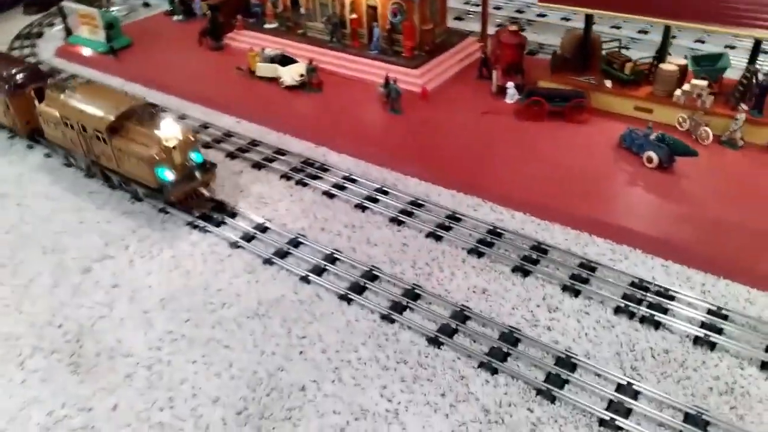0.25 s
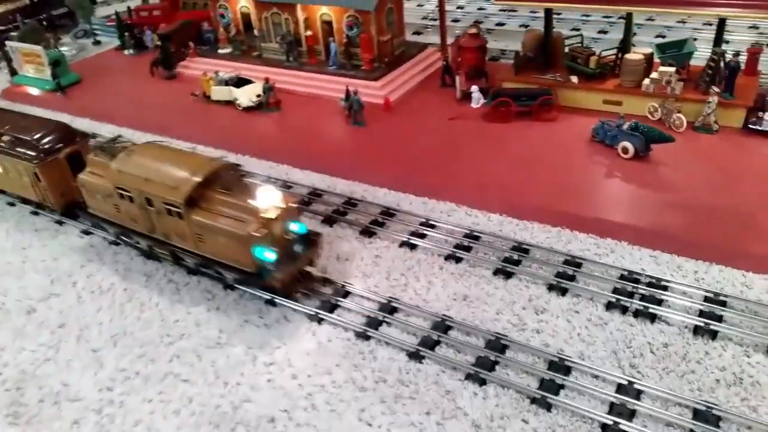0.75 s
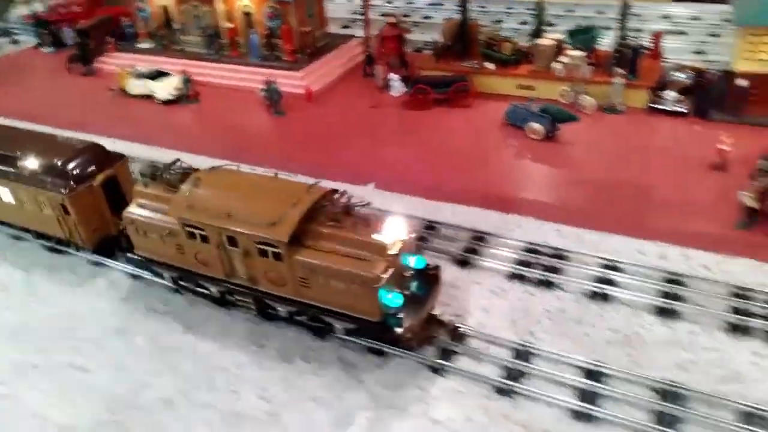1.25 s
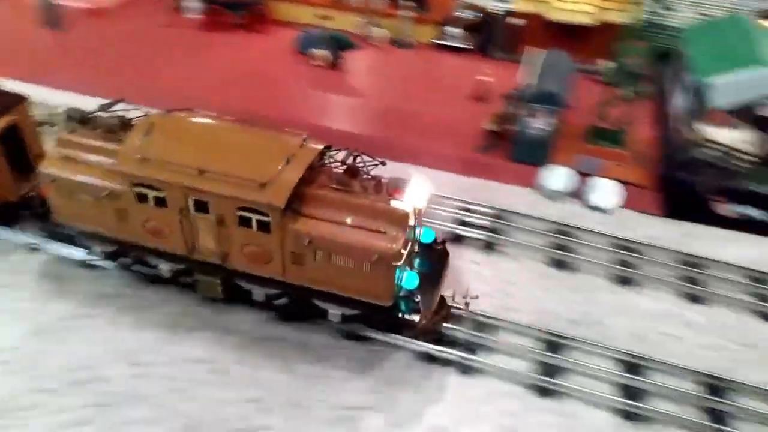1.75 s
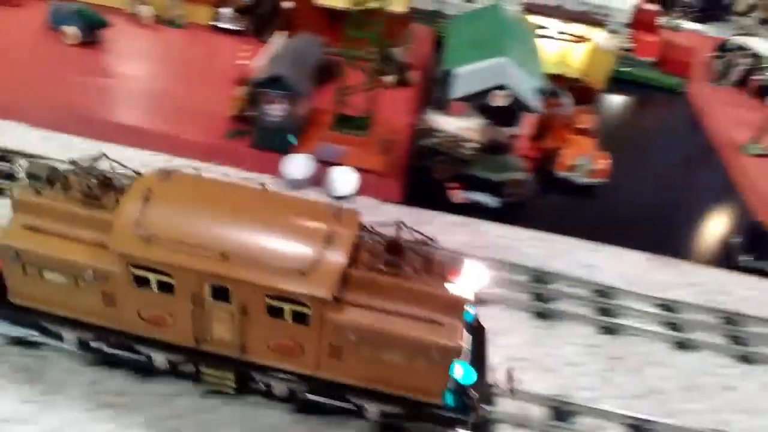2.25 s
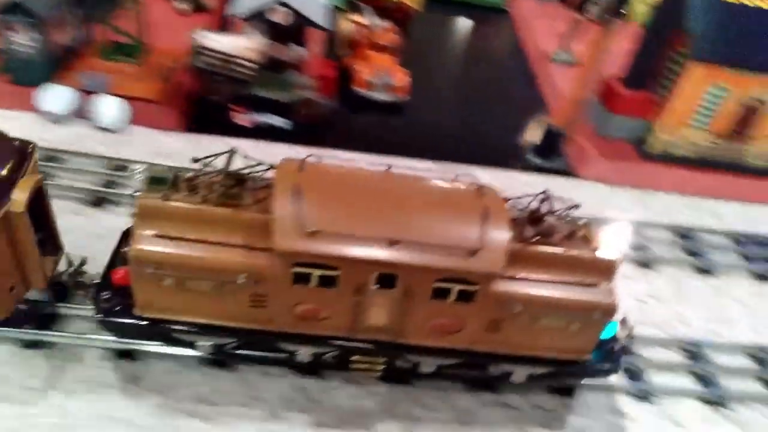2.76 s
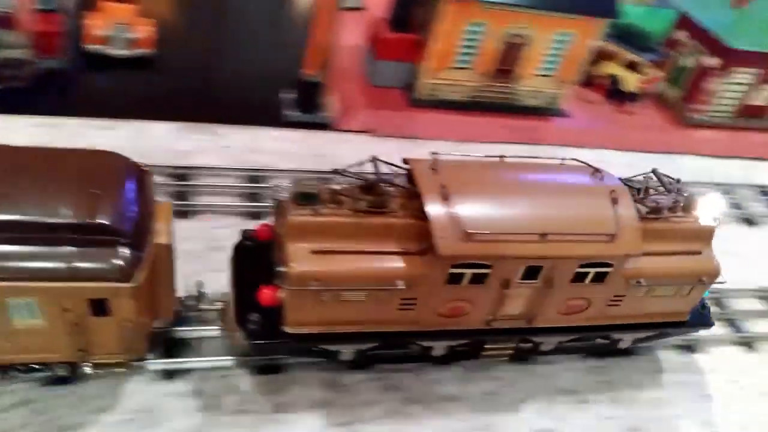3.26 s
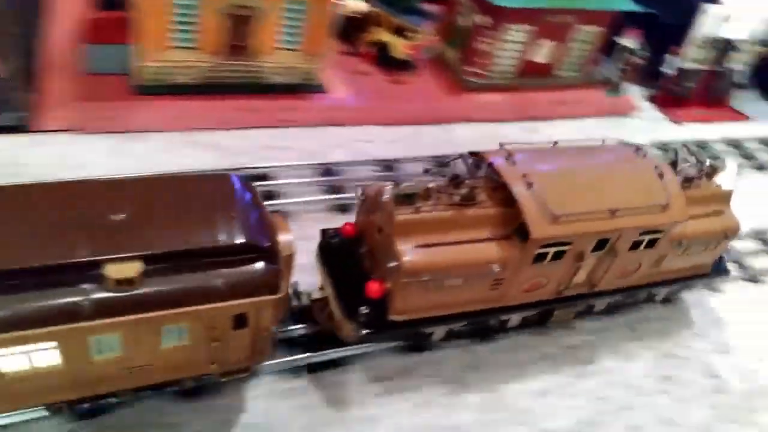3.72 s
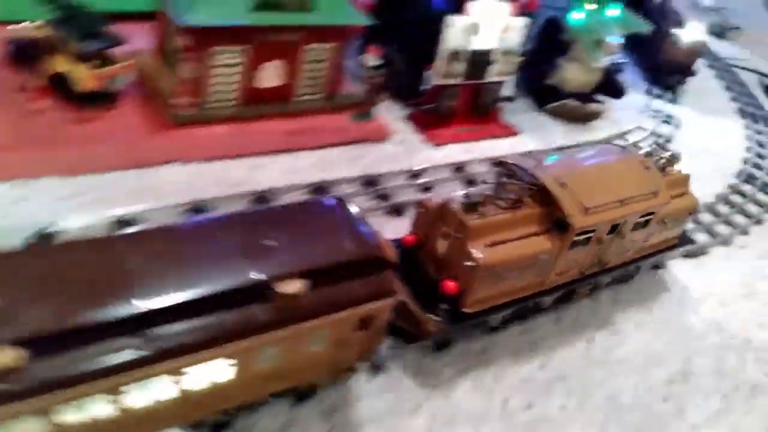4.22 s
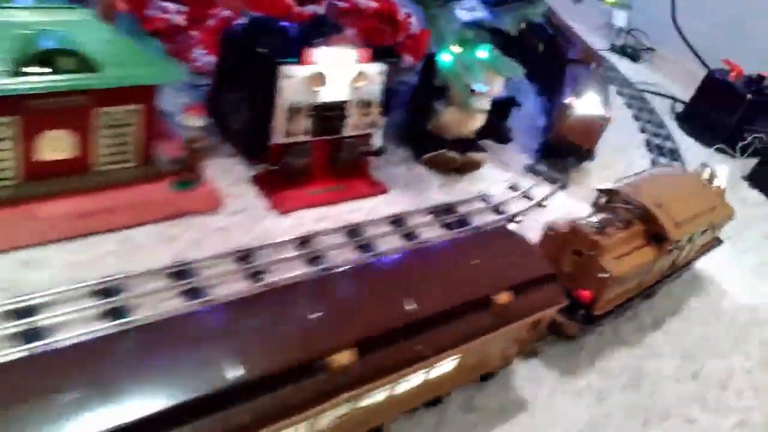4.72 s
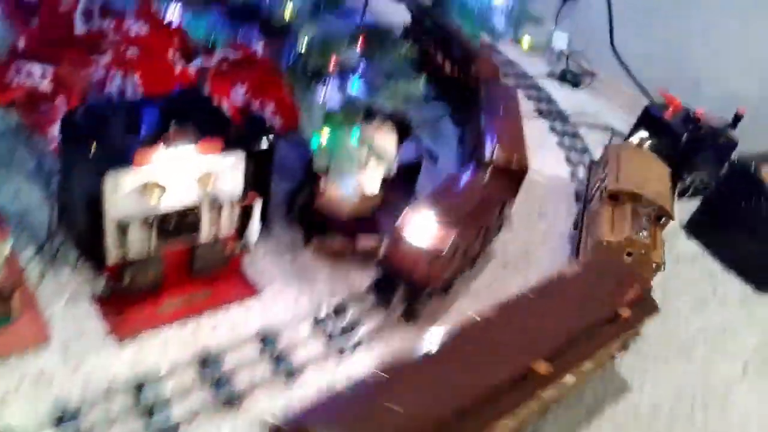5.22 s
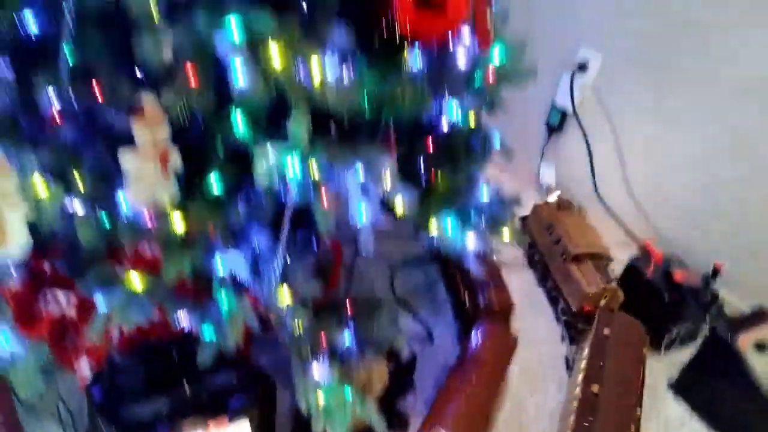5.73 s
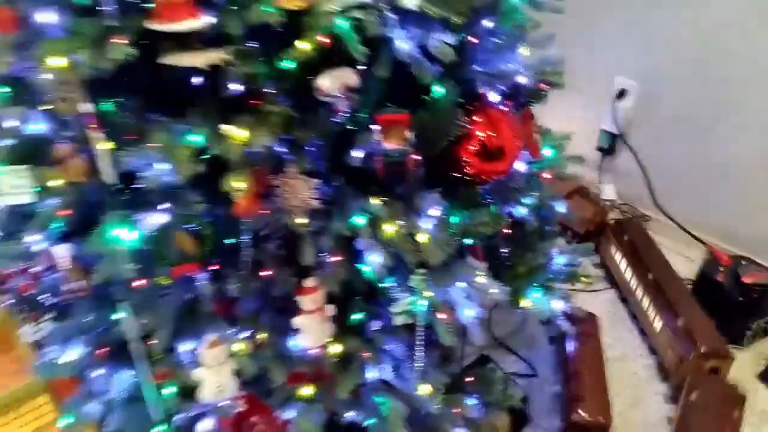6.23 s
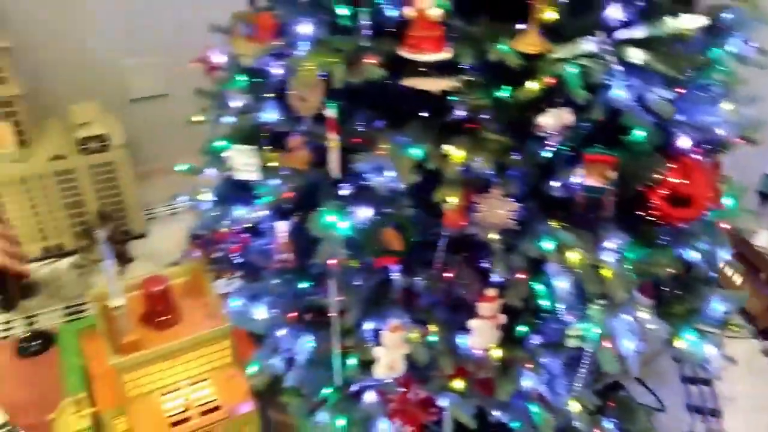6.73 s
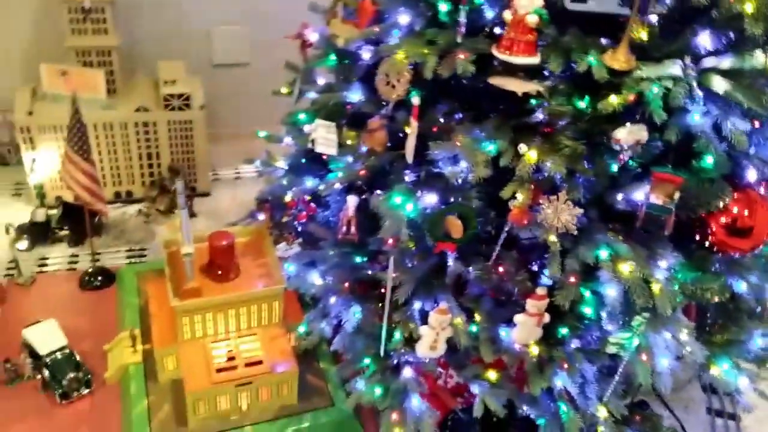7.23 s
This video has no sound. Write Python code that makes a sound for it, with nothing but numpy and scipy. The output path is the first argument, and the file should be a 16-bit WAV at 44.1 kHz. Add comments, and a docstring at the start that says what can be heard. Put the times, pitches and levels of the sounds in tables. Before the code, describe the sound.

Indoors, over a faint low room hum, a heavy tin toy train approaches on metal rails. A soft rumble and airy hiss grow into a fuller rattling roll with gear grind and crackle, strongest around one and a half to three and a half seconds. Very high scraping chirps and tiny pings recur, then settle to an even pulse as it recedes. Close stereo handheld microphone, the train crossing right to left.

```python
"""A heavy tinplate toy train rolls past on tubular steel track on carpet, over a low room hum.
From the start shaped noise gives the rumble of its bodies and the grind, whirr and hiss of rolling,
with short swells of narrow noise. Flange rubs soon drive the wheels by stick and slip; hard slips ping.
Delay and level between two microphones carry the train from right to left; after six seconds
narrow noise slides up in a hollow tone while the rolling goes on to the end."""
import sys
import numpy as np
from scipy import signal
from scipy.io import wavfile
from scipy.ndimage import uniform_filter1d

SR = 44100
rng = np.random.default_rng(int(sys.argv[2]) if len(sys.argv) > 2 else 0)


def waveform_to_disk(signal):
    """Save audio, clipped to [-1, 1], as 16-bit WAV at the path in sys.argv[1]."""
    frames = np.transpose(np.atleast_2d(signal))
    scaled = np.clip(frames, -1, 1) * 32767
    samples = np.round(scaled).astype(np.int16)
    wavfile.write(sys.argv[1], SR, samples)


N = 329691
HOP = 128  # samples between steps of the slow controls

# reference levels of the passing train, offset or scaled for each sound; positive lean is to the left:
# time_s, rumble_db, gears_db, whirr_db, hiss_db, lean_db
TRAIN_PATH = [(0.0, -61.5, -69, -65.5, -49, -1), (0.4, -59.5, -69, -64, -47, -3),
              (0.66, -61.5, -67.5, -68, -45.5, -3.5), (0.8, -60.5, -58.5, -65, -45, -4.5),
              (0.95, -55.5, -57, -58.5, -44.5, -2), (1.45, -49.5, -56.5, -56, -44.5, -5),
              (1.8, -56, -63, -57, -44, -4), (2.12, -53, -56, -51.5, -39.5, -2.5),
              (2.3, -53, -61.5, -55.5, -41.5, 0), (2.62, -56, -54, -49.5, -40.5, -1),
              (2.8, -56.5, -65, -57, -40.5, -5), (3.05, -54.5, -55, -56.5, -39, -1.5),
              (3.4, -54, -66, -53, -39.5, -1), (3.7, -56.5, -63.5, -61, -41.5, -2.5),
              (4.05, -57.5, -63, -56, -40, 0), (4.35, -56.5, -60, -57.5, -41.5, -1),
              (4.55, -57.5, -63, -60.5, -41, -0.5), (4.9, -58, -63.5, -62, -40.5, -0.5),
              (5.3, -59.5, -60.5, -63.5, -41.5, -1.5), (5.85, -59.5, -63, -63.5, -40.5, -2),
              (6.3, -61, -63.5, -64.5, -44.5, 0), (6.93, -60.5, -65, -66, -44, 0),
              (7.0, -58, -59, -79, -47.5, 4), (7.18, -62.5, -61, -72, -45.5, 4.5),
              (7.38, -55.5, -59, -67, -45.5, 2.5), (7.476, -58, -62, -63, -46, 0)]
# delay of the passing train at the left microphone: time_s, left_delay_samples
LEFT_DELAY = [(0, 7), (2.8, 6), (3.7, -1), (4.7, -6), (6.3, -7), (7.476, -4)]
# flange rubs; a rub spans its half length on either side of the centre:
# centre_s, half_length_s, ring_db, lower_over_upper_db, high_over_ring_db, scrape_over_ring_db, lean_db
FLANGE_RUBS = [(0.233, 0.14, -45, -17, -4, -14.5, -4), (0.452, 0.019, -44, -1.0, -20.0, -22, -11),
               (0.54, 0.15, -43, -9, -1, -11, -9), (0.604, 0.044, -44.5, 3, -12, -24, 0),
               (0.773, 0.032, -42, -5, -19.0, -25, -16), (0.875, 0.032, -27, -30, -20, -40, -31.0),
               (0.903, 0.061, -36, -19, -3, -16, -10), (1.219, 0.096, -37.5, -6, -8, -9.5, -3),
               (1.316, 0.067, -44, -2, -4, -5, -7), (1.52, 0.053, -28.5, -18, -7, -15.5, 2),
               (1.578, 0.084, -34.5, 4, 0, -8, -7), (1.823, 0.071, -40, -12, -1.5, -5, -22),
               (1.885, 0.079, -31, 8, -15, -5.5, 2), (2.01, 0.044, -43.5, 12.0, -17, 1.5, 0),
               (2.091, 0.12, -44, 0, 5.5, -2, -17), (2.145, 0.064, -38.5, -7, -4, 3, -6),
               (2.277, 0.051, -51.5, 0.0, -4, 8.5, -7), (2.442, 0.25, -44, -17, -2, -1.5, -22),
               (2.65, 0.065, -49, 6.0, 4, 10.5, -3), (2.716, 0.05, -38.5, -3, -8, -8, -1),
               (2.998, 0.035, -44, 1, -1, -15, -1), (3.057, 0.12, -46.5, -7, -4, -1.5, 4),
               (3.253, 0.057, -37.5, -12, -5, -10, 0), (3.304, 0.077, -35.5, 20, -13, -7.5, 18),
               (3.453, 0.067, -42.5, 1, -5, -4, 2), (3.529, 0.063, -26.5, -12, -11, -15, -9),
               (3.587, 0.1, -46.5, 6.0, -1, 3.5, 24), (3.797, 0.096, -35.5, -5, -9, -6.5, 4),
               (3.86, 0.068, -43.5, -1, -12, -1.5, 4), (3.906, 0.022, -46, 13.0, -18.0, -20, 0),
               (4.054, 0.093, -36.5, 2, -7, -9, 1), (4.28, 0.1, -38, 3, -4, -8.5, 4),
               (4.506, 0.068, -38, 0.0, -2, -9.5, 4), (4.738, 0.078, -35, -2, -7, -16, 0),
               (4.97, 0.092, -40, -2, -7, -12.5, 1), (5.199, 0.13, -39, 3, -9, -14.5, 4),
               (5.4, 0.084, -37, 5, -15, -17, 1), (5.41, 0.05, -43, 0, 7, -11, -8),
               (5.635, 0.075, -35.5, -3, -14, -15, 0), (5.865, 0.18, -40.5, 1, -11, -9.5, 0),
               (6.094, 0.065, -40, -4, -8, -14, 1), (6.33, 0.06, -38, -2, -13, -20, -1),
               (6.572, 0.14, -44.5, -3, -11, -16, 0), (6.853, 0.09, -37.5, 4, -13, -15.5, -4),
               (7.075, 0.11, -39.5, -2, -9, -12, -1.5), (7.337, 0.12, -44.5, -7, -8, -12.5, -4)]
# likeness of the noise at the two microphones: frequency_hz, likeness (0 to 1)
LIKENESS = [(30, 0.15), (130, 0.84), (300, 0.8), (640, 0.46), (1400, 0.27), (3000, 0.037), (9000, 0.062)]
# sheet-metal panels and rails that ring with the rolling: frequency_hz, level_over_rumble_db
PANEL_MODES = [(344, -18.5), (527, -15.5), (770, -25), (1100, -26), (1296, -17.5), (2080, -18.5),
               (2530, -17.5), (3356, -22), (5249, -18), (6216, -17)]


def gain_of(db):
    """Level definition: decibels to an amplitude factor."""
    return 10 ** (np.asarray(db) / 20)


def evened(x):
    """Normalisation by mean power: scaled to an rms of 1."""
    return x / np.sqrt(np.mean(x ** 2) + 1e-20)


def read(points, hz):
    """Spectral interpolation on a log-frequency axis."""
    f, value = np.transpose(points)
    return np.interp(np.log(hz + 1), np.log(f + 1), value)


def control(table, column, t):
    """Linear interpolation of one table column at the times t."""
    rows = np.asarray(table)
    return np.interp(t, rows[:, 0], rows[:, column])


def side_gains(level_db, lean_db):
    """Level stereophony: the lean is the left-right difference, shared equally."""
    return gain_of(level_db + np.array([lean_db / 2, -lean_db / 2]))


def partly_alike(same, shared, own):
    """Partial coherence: a mixture of shared and independent noise at constant power."""
    return same * shared + np.sqrt(1 - same ** 2) * own


def resonate(x, hz, width):
    """Heterodyne resonator: shifts the curve hz down to zero, smooths twice, and shifts back."""
    turn = np.exp(2j * np.pi * np.cumsum(hz * np.ones(x.shape[-1])) / SR)
    r = np.exp(-np.pi * width / SR)
    once = signal.lfilter([1 - r], [1, -r], x / turn)
    twice = signal.lfilter([1 - r], [1, -r], once)
    return 2 * (turn * twice).real


def rolling_noise(spectrum, level_db, lean_db, size, patchy_db, flicker_db):
    """Short-time synthesis of random spectra, with patches, flicker and a delay between microphones."""
    hop = size // 4
    frames, hz = N // hop + 5, np.fft.rfftfreq(size, 1 / SR)[:, None]
    a, b, c, d, left_patch, right_patch = rng.standard_normal((frames, len(hz), 6)).T
    # patches of 300 Hz by 50 ms, at least two cells each way
    wide, long = max(round(300 * size / SR), 2), max(round(.05 * SR / hop), 2)
    patches = []
    for p in (left_patch, left_patch + right_patch):
        patches.append(evened(uniform_filter1d(uniform_filter1d(p, wide, 0), long, 1)))
    flicker = evened(uniform_filter1d(rng.standard_normal(frames), 3))
    same, right = np.clip(read(LIKENESS, hz), 0, 1), a + 1j * b
    delay = control(LEFT_DELAY, 1, np.arange(frames) * hop / SR)
    late = np.exp(-2j * np.pi * hz * delay / SR)
    z = np.array([partly_alike(same, late * right, c + 1j * d), right])
    z *= gain_of(read(spectrum, hz) + patchy_db * np.array(patches) + flicker_db * flicker)
    noise = signal.istft(z, nperseg=size, noverlap=size - hop)[1][:, :N]
    return side_gains(level_db, lean_db) * evened(noise)


def room_hum():
    """Stationary low-frequency noise: the steady hum indoors."""
    # spectrum shape: frequency_hz, density_db_per_hz
    room_spectrum = [(15, -52), (25, -47), (102, -0.5), (145, -9.5), (220, -2), (290, -30), (480, -120)]
    return rolling_noise(room_spectrum, -75.5, np.zeros(N), size=4096, patchy_db=6.5, flicker_db=-0.5)


def body_rumble(rumble_db, lean_db):
    """Broadband panel radiation: rolling noise of the bodies, its bass weighted over time."""
    # spectrum shape: frequency_hz, density_db_per_hz
    rumble_spectrum = [(40, -60), (100, -42), (170, -17.5), (217, -6.5), (324, -0.5), (391, -2.5),
                       (432, 0.5), (522, -2.5), (653, -1), (809, -4.5), (943, -3.5), (1270, -2.5),
                       (1450, -9.5), (1880, -10), (3190, -120)]
    # gain of the bass band: time_s, gain_db
    bass_gain = [(0, -1.5), (0.7, -0.5), (1.5, -4.5), (1.85, 1.5), (2.3, -2), (2.65, 1.5), (3.2, 0),
                 (3.8, 0), (4.3, 0.5), (4.8, 2.5), (5.8, -1), (6.7, -1.5), (7.476, -7)]
    rumble = rolling_noise(rumble_spectrum, rumble_db, 0.26 * lean_db, size=1024, patchy_db=4.0, flicker_db=1.0)
    band = signal.butter(2, [196, 660], "bandpass", fs=SR, output="sos")  # Hz
    bass = signal.sosfiltfilt(band, rumble)
    return rumble + (gain_of(control(bass_gain, 1, np.arange(N) / SR)) - 1) * bass


def gear_grind(gears_db, lean_db):
    """Random excitation of the gears: mid-frequency shaped noise."""
    # spectrum shape: frequency_hz, density_db_per_hz
    grind_spectrum = [(820, -61), (1400, -12.5), (1890, -10.5), (2080, -7.5), (2560, -10), (2850, -12.5),
                      (3640, -36), (6160, -120)]
    return rolling_noise(grind_spectrum, gears_db, 1.3 * lean_db, size=1024, patchy_db=2.0, flicker_db=2.0)


def rail_whirr(whirr_db, lean_db):
    """Rolling excitation of the rails: shaped noise a few kilohertz high."""
    # spectrum shape: frequency_hz, density_db_per_hz
    whirr_spectrum = [(1590, -36), (2700, -7), (3030, -7), (3440, -3), (4820, -6), (5500, -10), (7150, -37),
                      (12100, -120)]
    return rolling_noise(whirr_spectrum, whirr_db + 0.5, 2.04 * lean_db, size=512, patchy_db=3.5, flicker_db=0.85)


def sliding_hiss(hiss_db, lean_db):
    """Sliding friction at the contacts: high-frequency shaped noise."""
    # spectrum shape: frequency_hz, density_db_per_hz
    hiss_spectrum = [(2650, -26.5), (4500, -17), (5900, -22.5), (7180, -8), (8640, -0.5), (9450, -4),
                     (9920, -6), (10700, -3.5), (12200, -8.5), (14000, -18), (15200, -21), (16000, -22)]
    return rolling_noise(hiss_spectrum, hiss_db - 5.0, 0.3 * lean_db, size=256, patchy_db=4.5, flicker_db=1.1)


def crackle(level_db, lean_db):
    """Impulse response to grit under the wheels: sparse uneven grains ring briefly in the rails."""
    # rail resonances; the width is that of each of two smoothings: frequency_hz, width_hz, over_whirr_db
    rail_modes = [(1240, 620, -16.5), (2500, 860, -9), (3310, 1080, -7), (6060, 1300, -6)]
    grains_per_s, spread_db = 700, 6.5
    chance, size = rng.random((2, 2, N))
    sign = np.sign(np.roll(size, 1) - .5)
    grains = (chance < grains_per_s / SR) * gain_of(-spread_db * np.log(size + 0.0093)) * sign
    rings = sum(gain_of(db) * evened(resonate(grains, hz, width)) for hz, width, db in rail_modes)
    return side_gains(level_db, lean_db) * rings


def flutter():
    """Amplitude modulation by wheel chatter: one quick, uneven wobble of level."""
    depth_db, smooth_s = 1.08, 0.028
    wobble = uniform_filter1d(rng.standard_normal(N), round(smooth_s * SR))
    wobble = uniform_filter1d(wobble, round(smooth_s * SR / 2))
    return evened(gain_of(depth_db * evened(wobble)))


def drone(rumble_db, lean_db):
    """Forced modal vibration: rolling keeps every panel humming, each waxing and waning on its own."""
    width_hz, damping, waver_depth_db = 23, 0.0056, 3.5  # width grows by the damping share of the pitch
    out, steps = np.zeros((2, N)), np.arange(N // HOP + 2)
    for hz, db in PANEL_MODES:
        shake, same = rng.standard_normal((2, N)), np.clip(read(LIKENESS, hz), 0, 1)
        shake[0] = partly_alike(same, shake[1], shake[0])
        waver = evened(uniform_filter1d(rng.standard_normal(len(steps)), 40))
        waver_db = waver_depth_db * np.interp(np.arange(N) / HOP, steps, waver)
        out += gain_of(db + waver_db) * evened(resonate(shake, hz, width_hz + damping * hz))
    return side_gains(rumble_db, lean_db) * out


def noise_swells(rows):
    """Windowed narrow-band noise: each row is a short swell of filtered noise at one pitch."""
    lean_spread_db = 3.5
    out, t = np.zeros((2, N + 12000)), np.arange(-6000, 6000) / SR  # longer swells are cut to this span
    for (s, half_length, hz, db), noise in zip(rows, rng.standard_normal((len(rows), 2, len(t)))):
        same, late = np.clip(read(LIKENESS, hz) + 0.05, 0, 1), round(control(LEFT_DELAY, 1, s))
        pan_db = control(TRAIN_PATH, 5, s) + lean_spread_db * noise[0, 0]
        left = partly_alike(same, np.roll(noise[1], late), noise[0])
        swell = resonate(np.array([left, noise[1]]), hz, 42 + 0.076 * hz)
        swell *= np.cos(np.pi / 2 * np.clip(t / half_length, -1, 1)) ** 2
        swell *= np.sqrt(half_length * SR) / np.linalg.norm(swell, axis=1, keepdims=True)
        at = round(s * SR)
        out[:, at:at + len(t)] += side_gains(db, pan_db)[:, None] * swell
    return out[:, 6000:N + 6000]


def rattles(count):
    """Random modal excitation: small swells at chance moments, each at one panel pitch."""
    half_length_s, over_rumble_db, spread_db = 0.041, 5.5, 0.5
    when, which, size = rng.random((count, 3)).T
    s, chosen = when * N / SR, (which * len(PANEL_MODES)).astype(int)
    hz, db = np.asarray(PANEL_MODES)[chosen].T
    db = db + control(TRAIN_PATH, 1, s) + over_rumble_db - spread_db * np.log(size + 0.019)
    return noise_swells([(a, half_length_s, f, level) for a, f, level in zip(s, hz, db)])


def rolling_swells():
    """Narrow-band fluctuation of the rolling sound: low booms and brief mid-pitched bursts."""
    # swells before side panning: centre_s, half_length_s, frequency_hz, level_db
    swell_rows = [(0.929, 0.074, 494, -55.5), (1.137, 0.037, 2250, -53.5), (1.32, 0.028, 770, -54),
                  (1.344, 0.054, 2040, -55), (1.361, 0.11, 1230, -57.5), (1.497, 0.024, 1190, -48),
                  (1.593, 0.042, 356, -46), (1.649, 0.033, 2220, -54.5), (1.851, 0.054, 492, -46),
                  (2.101, 0.1, 356, -47.5), (2.05, 0.27, 516, -52), (2.136, 0.038, 1980, -57),
                  (2.203, 0.028, 780, -50.5), (2.206, 0.039, 530, -48), (2.366, 0.043, 364, -50.5),
                  (2.579, 0.15, 517, -56), (2.645, 0.029, 2190, -56), (3.32, 0.04, 347, -54),
                  (3.375, 0.03, 337, -50), (3.4, 0.048, 310, -54), (3.27, 0.044, 262, -56),
                  (3.355, 0.06, 545, -60), (3.455, 0.04, 352, -59), (3.487, 0.014, 506, -54),
                  (3.487, 0.012, 320, -55), (3.285, 0.018, 1010, -57), (3.07, 0.034, 578, -56),
                  (2.17, 0.038, 367, -52), (2.0, 0.085, 396, -64), (2.55, 0.031, 346, -57),
                  (3.45, 0.12, 1350, -57.5), (3.6, 0.067, 1340, -59), (3.858, 0.039, 394, -50),
                  (3.86, 0.097, 2540, -55), (4.351, 0.024, 506, -50), (4.54, 0.025, 290, -51.5),
                  (4.76, 0.07, 787, -62), (5.056, 0.058, 1035, -58), (5.217, 0.035, 346, -56.5),
                  (5.873, 0.068, 2350, -60), (0.897, 0.16, 1145, -60), (1.005, 0.026, 426, -54.5),
                  (1.512, 0.033, 444, -55), (1.96, 0.027, 510, -66), (2.47, 0.056, 580, -57.5),
                  (4.0, 0.21, 1110, -64), (4.21, 0.028, 840, -57.5), (4.26, 0.2, 487, -59.5),
                  (4.765, 0.045, 390, -57), (4.945, 0.029, 456, -55), (5.02, 0.05, 290, -61),
                  (5.38, 0.035, 1320, -58.5), (5.534, 0.017, 1180, -56.5), (2.11, 0.11, 468, -49.5),
                  (2.62, 0.084, 575, -57.5), (0.03, 0.025, 523, -59), (1.0, 0.2, 328, -62.5),
                  (7.44, 0.06, 2180, -63), (7.31, 0.05, 2150, -63), (0.85, 0.12, 2150, -64),
                  (0.13, 0.087, 665, -65.5), (0.7, 0.03, 1300, -59.5), (1.2, 0.2, 187, -71),
                  (1.84, 0.1, 524, -53.5), (2.37, 0.027, 568, -51.5), (7.0, 0.05, 1100, -59),
                  (7.11, 0.086, 1100, -59.5), (7.025, 0.024, 1480, -60), (7.025, 0.025, 2000, -58),
                  (7.065, 0.025, 1740, -57), (7.15, 0.031, 1950, -60), (7.24, 0.27, 1970, -65.5),
                  (7.365, 0.018, 2020, -55), (7.405, 0.03, 2040, -55), (7.05, 0.25, 220, -81)]
    return noise_swells(swell_rows)


def rub_force(level_db, lean_db, t):
    """Contact force envelope: left and right power of the rubbing, one soft bump per rub."""
    early = 0.19  # a rub bites faster than it lets go: its top comes this share of the half length early
    rows = np.asarray(FLANGE_RUBS)
    phase = (t - rows[:, :1]) / rows[:, 1:2] + early
    phase /= np.where(phase < 0, 1 - early, 1 + early)
    bumps = np.cos(np.pi / 2 * np.clip(phase, -1, 1)) ** 6
    sides = np.array([gain_of(lean_db), gain_of(-lean_db)])
    return gain_of(2 * level_db) * 2 * sides / sides.sum(0) @ bumps


def rubs(modes, level_db, lean_db, steady_db, grit_db, ticks_db, wander_db):
    """Stick-slip excitation: uneven flange friction with tiny ticks drives one group of resonances."""
    t = np.arange(N // HOP + 2) * HOP / SR
    # the wheel sings softly between rubs too
    rolling = gain_of(2 * (control(TRAIN_PATH, 4, t) + steady_db))
    pressure = np.sqrt(rub_force(level_db, lean_db, t) + rolling)
    slips, chance = rng.standard_normal((2, 2, N))
    grit = gain_of(grit_db * np.tanh(evened(uniform_filter1d(slips, 130, axis=1))))  # slips of a few ms
    ticks = gain_of(ticks_db) * (chance > 2.6)  # about two hundred a second
    texture, out = evened(grit + ticks), np.zeros((2, N))
    for hz, width, db in modes:
        # the point of contact wanders, so each resonance waxes and wanes on its own
        wander = evened(uniform_filter1d(rng.standard_normal(pressure.shape), 10, axis=1))
        wandering = pressure * evened(gain_of(wander_db * wander))
        force = [np.interp(np.arange(N) / HOP, np.arange(len(t)), p) for p in wandering]
        peak = np.concatenate(signal.iirpeak(hz, hz / width, SR))
        out += gain_of(db) * signal.sosfilt([peak, peak], force * texture * rng.standard_normal((2, N)))
    noise_power_gain = sum(gain_of(2 * db) * np.pi / 2 * width / SR for hz, width, db in modes)
    return out / np.sqrt(noise_power_gain)


def wheel_song(ring_db, lower_db, high_db, scrape_db, side_db, scrape_side_db):
    """Modal superposition: one history of rubs excites four groups of wheel resonances."""
    # each group, relative levels; the width is that of each of two filters in series:
    # frequency_hz, width_hz, level_db
    upper_modes = [(9660, 110, 1), (9700, 300, -2), (9800, 800, -10), (10300, 700, -15), (10800, 200, -12)]
    lower_modes = [(9180, 140, 0), (9330, 160, -2), (8800, 900, -9)]
    high_modes = [(11620, 460, 11), (11500, 2200, 5.5), (12200, 510, 10.5), (13100, 700, 5),
                  (13900, 1300, 1.5), (15000, 500, 0.5), (12500, 70, 16.5), (13000, 90, 10), (13400, 78, 3),
                  (14690, 70, 3), (15600, 280, 4)]
    scrape_modes = [(5506, 700, 6.1), (6300, 720, 7), (6800, 830, 8.7), (7560, 760, 10.3), (8150, 640, 6.9)]
    # upper and lower rings together carry the power of ring_db
    upper_db = ring_db - 10 * np.log10(1 + gain_of(2 * lower_db))
    song = rubs(upper_modes, upper_db, side_db,
                steady_db=-8.0, grit_db=-2.0, ticks_db=14.5, wander_db=5.0)
    song += rubs(lower_modes, upper_db + lower_db, side_db,
                 steady_db=-8.0, grit_db=6.0, ticks_db=24, wander_db=1.0)
    song += rubs(high_modes, ring_db + high_db, side_db,
                 steady_db=-14.5, grit_db=7.5, ticks_db=12, wander_db=5.5)
    song += rubs(scrape_modes, ring_db + scrape_db, scrape_side_db,
                 steady_db=-15.0, grit_db=1.0, ticks_db=8, wander_db=4.5)
    return song


def pings():
    """Impulsive slip: the wheel snaps, its tone swells within two milliseconds and dies in a few more."""
    # single hard slips: time_s, peak_db, frequency_hz, lean_db
    slip_rows = [(0.4377, -38.5, 9700, -12), (0.864, -30, 9800, -30), (0.871, -28.5, 9650, -36),
                 (1.1777, -40, 9600, -8), (1.494, -25.5, 9750, 10), (1.8692, -30.5, 9300, 1),
                 (1.9864, -39, 8620, 2), (2.4203, -33, 9600, -5), (2.9806, -34, 10000, -2),
                 (3.0364, -31, 9600, 8), (3.2286, -41, 9900, -2), (3.29, -35, 6480, 13),
                 (3.4805, -32, 9740, -7), (3.498, -29, 9850, -16), (3.534, -28, 9600, -13.5),
                 (3.5425, -28, 9800, -10.5), (3.7539, -37, 10000, -1), (3.9085, -39, 9200, 0),
                 (4.0, -36, 9250, 0), (4.103, -33, 9300, 0), (4.276, -32, 8450, 7),
                 (4.465, -33, 10000, -10), (4.4927, -31, 9190, 7), (4.6315, -34.5, 8900, 0),
                 (4.702, -35, 9450, -4), (5.3964, -32, 9600, -11), (5.6087, -37, 9730, -1),
                 (5.6314, -28.5, 9660, -1.5), (5.831, -30, 9730, -13), (6.0621, -36, 9700, 0),
                 (6.318, -33, 9560, -1), (6.8184, -39, 9660, -4)]
    rise_s, snap_db, snap_decay_s = 0.0014, -20, 0.0021
    out, t = np.zeros((2, N + 900)), np.arange(900) / SR
    shape = t / rise_s * np.exp(1 - t / rise_s)
    for (s, db, hz, pan_db), noise in zip(slip_rows, rng.standard_normal((len(slip_rows), len(t) + 1))):
        bright = np.diff(np.diff(noise, prepend=0)) / 2  # differencing favours the treble
        snap = gain_of(snap_db) * np.exp(-t / snap_decay_s) * bright
        ping = shape * np.sin(2 * np.pi * (hz * t + noise[0])) + snap
        at = round(s * SR)
        out[:, at:at + len(t)] += side_gains(db, pan_db)[:, None] * ping
    return out[:, :N]


def slide():
    """Swept resonance: narrow noise slides up as the cars swing behind a tree."""
    # the hollow tone: time_s, frequency_hz, level_db
    slide_path = [(6.32, 199, -77), (6.36, 218, -61), (6.44, 295, -64), (6.5, 606, -69), (6.57, 766, -69),
                  (6.62, 760, -72)]
    t = np.arange(N) / SR
    heard = (t > slide_path[0][0]) & (t < slide_path[-1][0])
    tone = evened(resonate(rng.standard_normal(N), control(slide_path, 1, t), 81))
    return heard * gain_of(control(slide_path, 2, t)) * tone


def scene():
    """Superposition of sources: room hum, rolling noises and swells, flange rubs, pings and slide."""
    t, steps = np.arange(N) / SR, np.arange(N // HOP + 2) * HOP / SR
    rumble_db, gears_db, whirr_db, hiss_db, lean_db = (control(TRAIN_PATH, k, t) for k in range(1, 6))
    ring_db, lower_db, high_db, scrape_db, side_db = np.transpose(FLANGE_RUBS)[2:]
    scrape_side_db = 0.56 * side_db + 1.5  # the scrape leans less than the rings, with a bias to the left
    # each scrape also shakes the gears and the rails: powers add
    force = rub_force(ring_db + scrape_db, scrape_side_db, steps)
    shake = np.array([np.interp(t, steps, p) for p in force])
    gears_db = 10 * np.log10(gain_of(2 * gears_db) + gain_of(2 * -17) * shake)
    whirr_db = 10 * np.log10(gain_of(2 * whirr_db) + gain_of(2 * -11.5) * shake)

    rolling = body_rumble(rumble_db, lean_db)
    rolling += gear_grind(gears_db, lean_db)
    rolling += rail_whirr(whirr_db, lean_db)
    rolling += crackle(whirr_db, 1.4 * lean_db)
    out = room_hum() + flutter() * rolling  # these four flutter together
    out += sliding_hiss(hiss_db, lean_db)
    out += drone(rumble_db, 0.21 * lean_db)
    out += rattles(count=40) + rolling_swells()
    out += wheel_song(ring_db, lower_db, high_db, scrape_db, side_db, scrape_side_db)
    return out + pings() + slide()


def record(dry):
    """Band limitation: a linear-phase low-pass filter at 16 kHz."""
    lowpass = signal.firwin(511, 16000, window=("kaiser", 9), fs=SR)
    return signal.oaconvolve(dry, lowpass[None], "same")


dry = scene()
out = record(dry)
waveform_to_disk(out)
```